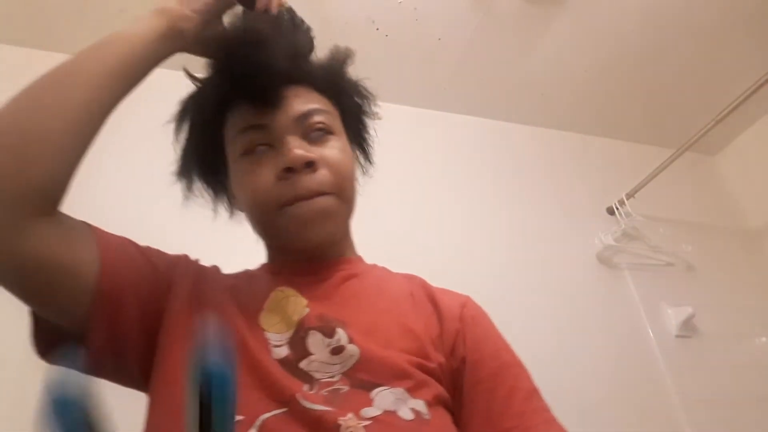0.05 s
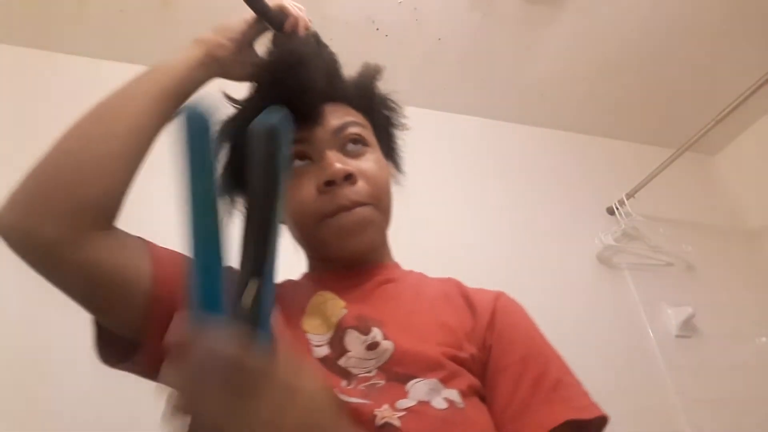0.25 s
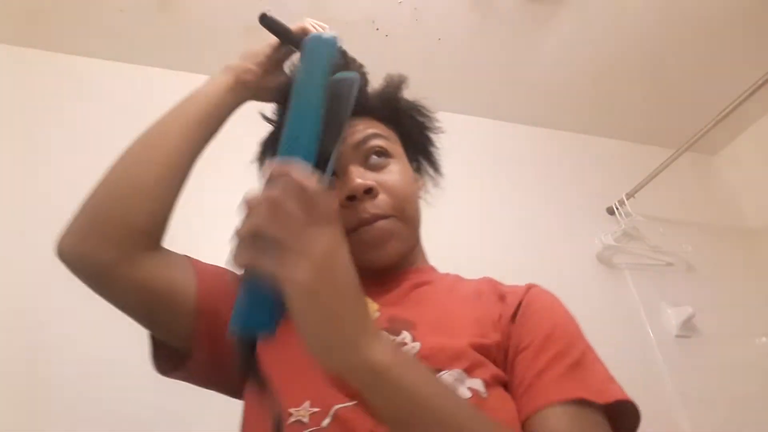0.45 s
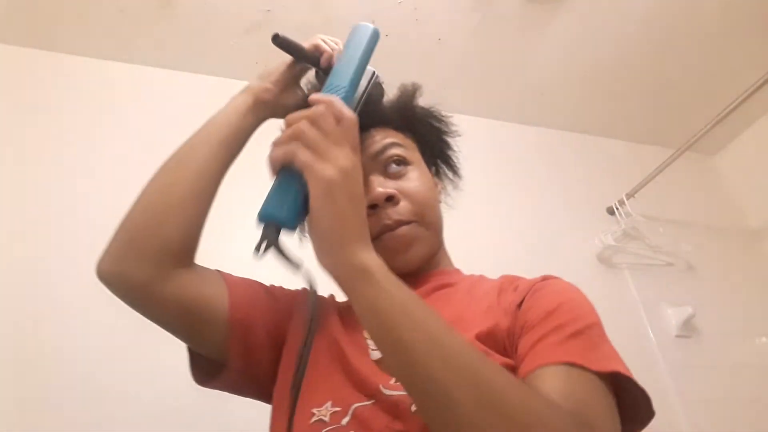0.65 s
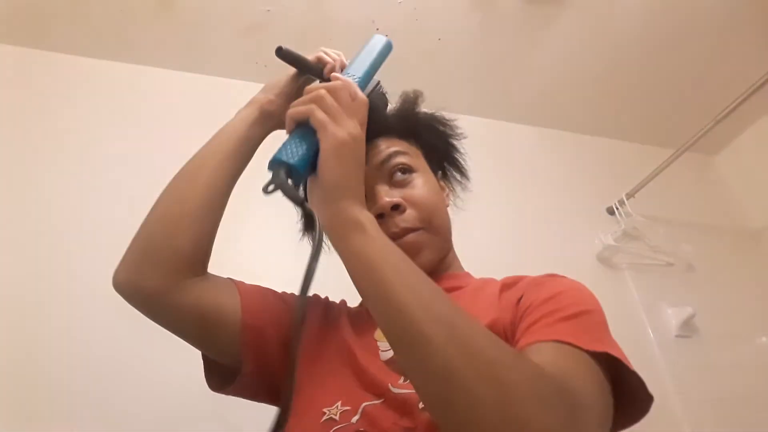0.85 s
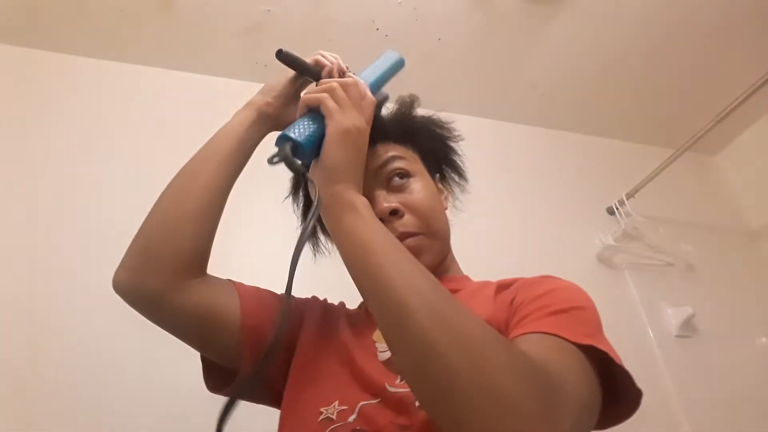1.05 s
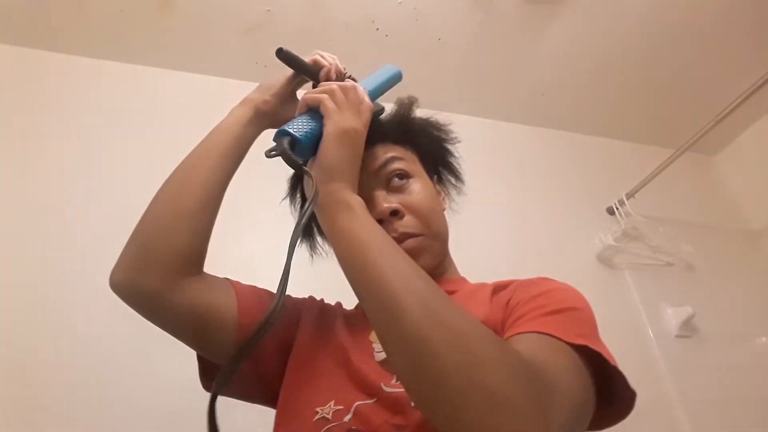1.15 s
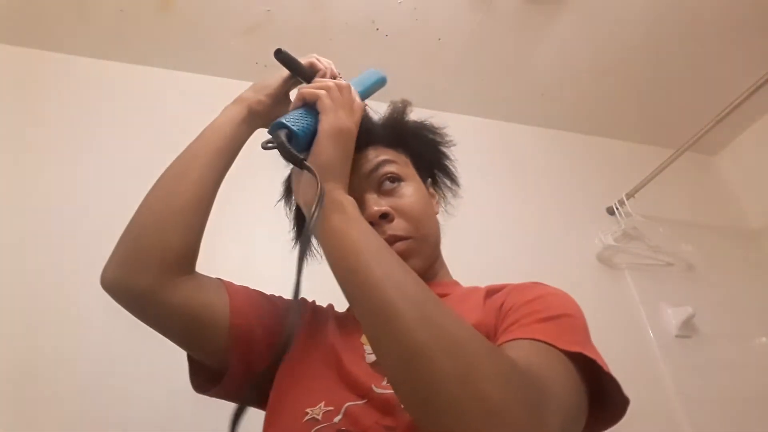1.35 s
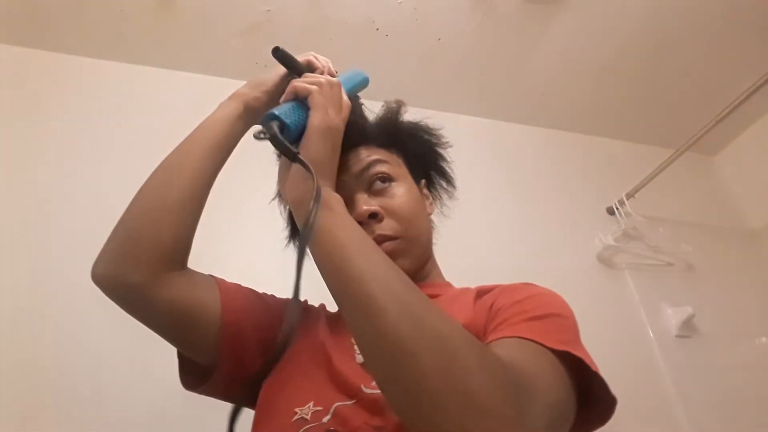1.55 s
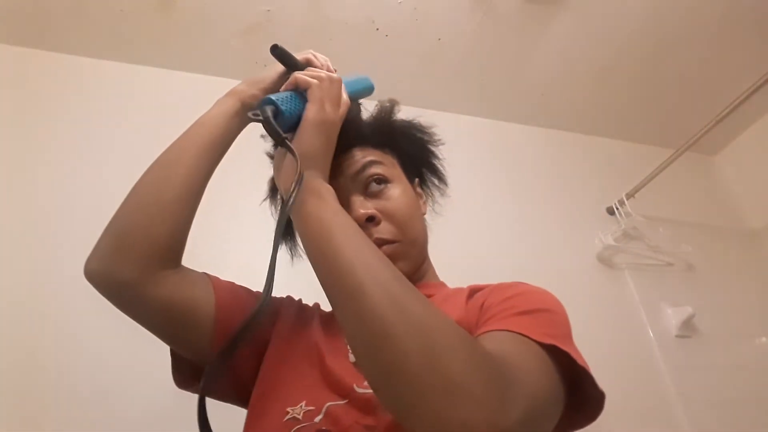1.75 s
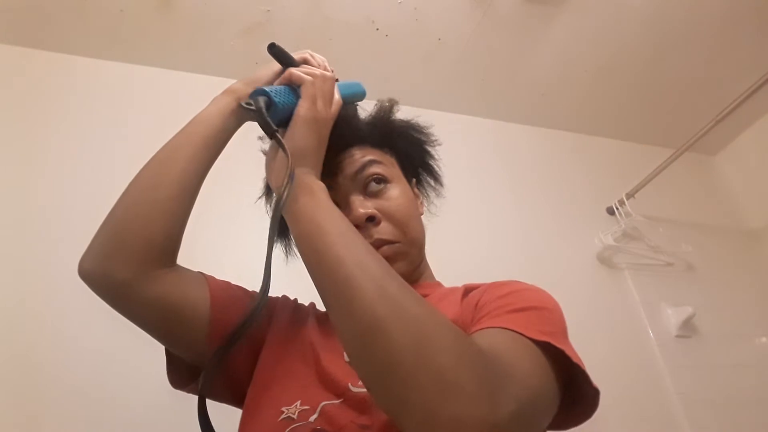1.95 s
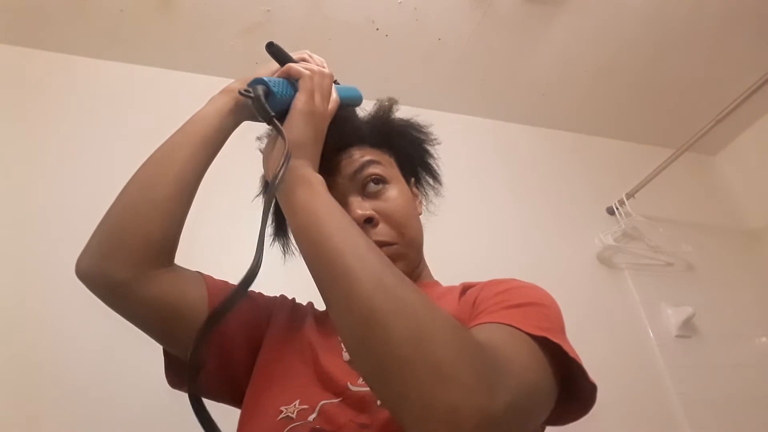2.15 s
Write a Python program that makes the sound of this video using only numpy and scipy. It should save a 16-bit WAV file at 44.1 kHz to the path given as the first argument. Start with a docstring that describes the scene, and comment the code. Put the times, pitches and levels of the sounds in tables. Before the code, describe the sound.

A hair flat iron is picked up with a quick cluster of plastic clacks and scrapes at about 0.2 seconds. Two sharp clacks with faint metal chinks follow at 0.55 and 0.75 seconds, amid light rubbing and a faint hair rustle. Softer knocks come near 1.1 and 1.3 seconds, each ringing briefly in the small bathroom. Then low ventilation rumble and thin hiss remain, with a slight rub around 2.1 seconds.

```python
"""A hair flat iron is picked up, handled and clamped on hair in a small, hard-walled bathroom.
Its plastic arms clack shut and the metal plates chink; the case, the cord and the hand scrape in between.
Each contact rings the case briefly and the room for longer. A stereo pair of microphones hears it
over a low ventilation rumble, a thin hiss and a faint rustle of hair."""
import sys
import numpy as np
from scipy import signal
from scipy.fft import rfft, irfft
from scipy.io import wavfile

SR = 44100
rng = np.random.default_rng(int(sys.argv[2]) if len(sys.argv) > 2 else 0)


def materialize(psi):
    """Save the field psi as 16-bit PCM at rate SR to the path in sys.argv[1].

    A 1-D psi becomes a single channel; in a 2-D psi each row is a channel.
    """
    bounded = np.clip(np.atleast_2d(psi).T, -1, 1)
    quanta = np.round(bounded * 32767).astype(np.int16)
    wavfile.write(sys.argv[1], SR, quanta)


N = 97020

# how alike the two microphones hear the diffuse field: frequency_hz, correlation
MIC_LIKENESS = [(60, 0.98), (170, 0.94), (350, 0.78), (700, 0.27), (1200, -0.21), (3000, 0), (16000, 0)]


def undb(db):
    """Decibels to gain."""
    return 10 ** (np.asarray(db) / 20)


def unit(x):
    """Scale to rms 1."""
    return x / np.sqrt(np.mean(x ** 2))


def pan(db):
    """Left and right gains for a level difference."""
    return undb(np.array([[db], [-db]]) / 2)


def along(table, hz):
    """Read a two-column table on a log-frequency axis."""
    table = np.array(table)
    return np.interp(np.log(hz + 1e-9), np.log(table[:, 0]), table[:, 1])


def bins():
    """Frequencies of the spectrum of a full-length signal."""
    return np.arange(N // 2 + 1) * SR / N


def shape(x, spectrum):
    """Minimum-phase filter that follows a table of frequency_hz, level_db."""
    cepstrum = irfft(np.log(undb(along(spectrum, bins())) + 1e-9), N)
    cepstrum[1:N // 2] *= 2
    cepstrum[N // 2 + 1:] = 0
    response = irfft(np.exp(rfft(cepstrum)), N)[:N // 20]
    return signal.fftconvolve(x, response)[:N]


def soften(x, treble_hz, bass_hz):
    """A softer contact loses treble but for a little grit; a lighter one loses bass."""
    dull = signal.sosfilt(signal.butter(2, treble_hz, fs=SR, output="sos"), x + 1e-18)
    grit = undb(-14.5) * x * treble_hz / 3000
    return signal.sosfilt(signal.butter(1, bass_hz, "high", fs=SR, output="sos"), dull + grit)


def resonate(x, hz, width_hz):
    """Band-pass with gain 1 at the centre."""
    return signal.lfilter(*signal.iirpeak(hz, hz / width_hz, fs=SR), x)


def ring(hz, db, t60, phase=0):
    """Impulse response of one mode, with gain db at its peak."""
    t, rate = np.arange(SR // 2) / SR, np.log(1000) / t60
    return undb(db) * 2 * rate / SR * np.exp(-rate * t) * np.cos(2 * np.pi * hz * t + phase)


def diffuse():
    """Spectra of white noise at the two microphones, alike in the bass."""
    likeness = np.clip(along(MIC_LIKENESS, bins()), -.99, .99)
    mid, side = rfft(rng.standard_normal((2, N)))
    return mid * np.sqrt((1 + likeness) / 2) + np.array([[1], [-1]]) * side * np.sqrt((1 - likeness) / 2)


def ventilation():
    """Room tone: steady rumble, stronger at the left microphone, and bands of hiss that swell and sink."""
    # rumble and its faint treble: frequency_hz, relative_density_db
    rumble_spectrum = [(25, -21), (42, -33), (59, -11.5), (80, -24.5), (100, -13), (125, -6.5), (170, -2),
                       (230, -6.5), (320, -12), (450, -23), (850, -24), (1500, -29), (2300, -33.5),
                       (4000, -35.5), (6500, -43.5), (10000, -43), (16000, -37.5)]
    # narrow bands of hiss: centre_hz, width_hz, level_db
    hiss_bands = [(2787, 320, -69), (5320, 83, -81), (4880, 210, -79), (7900, 240, -94)]
    # drift added to the level of those bands: time_s, gain_db
    hiss_drift = [(0, 1), (.9, 6), (1.248, -3.5), (1.36, -0.5), (1.8, -3.5), (2.2, -0.5)]
    t, f = np.arange(N) / SR, bins()
    lean_left = 1.5 + (pan(5) - 1) / (1 + (f / 900) ** 2)
    rumble = unit(irfft(diffuse() * undb(along(rumble_spectrum, f)) * lean_left, N))
    hiss = 0
    for hz, width_hz, db in hiss_bands:
        band = diffuse() / (1 + ((f - hz) / (width_hz / 2)) ** 2)
        hiss += undb(db) * unit(irfft(band, N))
    return rumble * undb(-52.5) + hiss * undb(np.interp(t, *np.array(hiss_drift).T))


def hair():
    """Hair rustles faintly between the fingers until the plates hold it."""
    level_db, fade_s = -69.5, (0.88, 1.16)
    rustle = unit(resonate(rng.standard_normal((2, N)), hz=7140, width_hz=11025))
    return rustle * undb(level_db) * np.interp(np.arange(N) / SR, fade_s, (1, 0))


def slips(per_s=1300, scatter_db=3):
    """Dense stick-slip clicks of uneven size, rms 1."""
    clicks = (rng.random(N) < per_s / SR) * rng.choice([-1, 1], N)
    return unit(clicks * undb(scatter_db * rng.standard_normal(N)))


def scrapes():
    """Case, cord and hand rub: stick-slip that swells, holds and dies away, each with one resonance."""
    # rubs: start_s, attack_s, hold_s, release_s, relative_db, treble_hz, bass_hz, resonance_hz
    strokes = [(0.202, 0.0054, 0.056, 0.0089, -24.5, 3520, 1580, 2920),
               (0.219, 0.014, 0.028, 0.0087, -25.5, 830, 110, 770),
               (0.288, 0.012, 0.07, 0.026, -35.5, 2500, 256, 635),
               (0.399, .018, 0.0063, 0.0075, -28.5, 2760, 394, 450),
               (0.474, .012, 0.0093, 0.037, -31.5, 3750, 1600, 2700),
               (0.663, .005, 0.028, 0.024, -31.5, 1500, 198, 350),
               (0.86, 0.017, 0.013, 0.023, -37.5, 2660, 640, 935),
               (.942, 0.017, 0.032, 0.022, -34, 1330, 129, 663),
               (1.036, 0.0058, 0.042, 0.013, -43, 1240, 250, 674),
               (1.131, 0.0031, 0.018, .012, -34.5, 4050, 2530, 2950),
               (1.145, 0.019, 0.032, 0.018, -37, 257, 130, 266),
               (2.1, 0.073, .05, .02, -46.5, 1370, 246, 503)]
    trim_db, resonance_db, resonance_q = -4.5, 2.5, 8.9
    t, out = np.arange(N) / SR, np.zeros(N)
    for start, attack, hold, release, db, treble_hz, bass_hz, hz in strokes:
        swell = np.clip((t - start) / attack, 0, 1)
        fade = np.exp(-np.maximum(t - start - attack - hold, 0) / release)
        rub = soften(slips() * swell * fade, treble_hz, bass_hz) * undb(db + trim_db)
        out += rub + undb(resonance_db) * resonate(rub, hz, hz / resonance_q)
    return out


def clacks():
    """One sharp push for each meeting of the arms, and a weaker rebound."""
    # knocks of arms and hinge: start_s, relative_db, treble_hz, bass_hz, rebound_ms, rebound_db
    knocks = [(.2060, -5, 4800, 1500, 3.8, -7), (0.216, -2, 4300, 1460, 1.47, -9.5),
              (.2360, -8.5, 3500, 150, 2.17, -6), (0.2439, -17, 4500, 500, 7.4, -22),
              (0.3884, -6, 3500, 407, 2.57, -8), (0.5497, 2.5, 4630, 420, 2.67, -13.5),
              (0.6661, -25, 1500, 350, 4, -14), (0.7552, 0.5, 4360, 400, 2.5, -15),
              (0.945, -18, 1200, 248, 4, -7), (1.1364, -10, 2620, 297, 4.16, -5),
              (1.3263, -12.5, 1210, 600, 3.2, -18)]
    trim_db, out = -4, np.zeros(N)
    for start, db, treble_hz, bass_hz, rebound_ms, rebound_db in knocks:
        push = np.zeros(N)
        push[int(start * SR)] = undb(db + trim_db)
        push[int((start + rebound_ms / 1000) * SR)] += undb(db + trim_db + rebound_db)
        out += soften(push, treble_hz, bass_hz)
    return out


def chinks():
    """The loose metal plates chatter briefly at a high resonance."""
    # touches of the plates: start_s, relative_db, pitch_hz, width_hz, decay_s
    touches = [(.5500, -24, 7560, 3000, 0.0098), (.561, -23, 7550, 700, .002),
               (.7560, -30.5, 8150, 3000, .012), (0.873, -45, 7840, 910, 0.026),
               (1.1357, -21, 4850, 600, 0.009), (1.1351, -24.5, 10000, 5000, 0.00047)]
    trim_db = -15.5
    t, out = np.arange(N) / SR, np.zeros(N)
    for start, db, hz, width_hz, decay in touches:
        chatter = rng.standard_normal(N) * (t >= start) * np.exp(-abs(t - start) / decay)
        out += resonate(chatter, hz, width_hz) * undb(db + trim_db)
    return out


def flat_iron():
    """The iron up close: clacks bend and ring the case, scrapes ring it less, the plates chink on top."""
    # modes of the case and plates: pitch_hz, level_over_contact_db, t60_s
    case_modes = [(411, 0, 0.022), (842, 3, 0.021), (1050, 8.5, 0.034), (1800, 3, 0.032),
                  (2257, 0.5, 0.018), (2675, 6, 0.015), (3670, -6, 0.025), (7900, 8, 0.011)]
    # tone of a knock on the case: frequency_hz, level_db
    knock_spectrum = [(60, 1.5), (170, -0.5), (400, 7), (620, 3.5), (950, 0), (1550, 0), (2500, -1.5),
                      (4000, -1.5), (6000, -7), (8000, -11), (11000, -8), (16000, -19)]
    # tone of rubbing: frequency_hz, level_db
    rub_spectrum = [(60, -8), (170, 10.5), (330, 0), (460, 0), (680, -0.5), (1000, -0.5), (1550, -2),
                    (2200, -1.5), (3200, -4), (4300, -3), (6000, -13), (8000, -6), (11000, -17.5),
                    (16000, -30)]
    case = sum(ring(hz, db, t60) for hz, db, t60 in case_modes)
    push, rub = clacks(), scrapes()
    bent = push - 2 * resonate(push, hz=1300, width_hz=1380)  # bending waves in this band arrive late
    struck = bent + signal.fftconvolve(bent, case)[:N]
    rubbed = rub + undb(-16.5) * signal.fftconvolve(rub, case)[:N]
    return shape(struck, knock_spectrum) + shape(rubbed, rub_spectrum) + chinks()


def arrival(ms):
    """An impulse that reaches a microphone ms late, placed between samples."""
    offset = np.arange(SR // 2) - ms / 1000 * SR
    return np.sinc(offset) * (abs(offset) < 8)


def bathroom(early_db):
    """From iron to microphones: direct path, first reflections, a diffuse tail and standing waves."""
    # first reflections off mirror, counter and walls: delay_ms, left_db, right_db
    reflections = [(.9, -3.5, -9.5), (1.95, -12, -33), (2.5, -6, -46), (4.6, -17.5, -6), (12.4, -5, -12.5),
                   (17.6, -8.5, -16)]
    # diffuse reverberation: frequency_hz, t60_s, level_db
    reverb_bands = [(99, 0.93, -1.5), (202, 0.57, 2.5), (540, 0.4, -0.5), (1340, .29, 2), (3630, 0.35, 0.5),
                    (8100, 0.29, 2), (15100, .14, -1)]
    # standing waves between the walls: pitch_hz, level_db, t60_s
    standing_waves = [(174.3, 4, 0.35), (393, 4, 0.28), (500, 10.5, 0.86), (543.5, 9.5, 0.18),
                      (638.6, 7.5, 0.39), (746, 5, 0.48), (791, 7.5, 0.24), (866, -1, 0.59), (1067, 0, 1),
                      (1118, -3, 0.31), (1286, 13, 0.54), (1335, 14.5, 0.17)]
    direct_lag_ms, reflection_lag_ms = 0.034, 0.14  # the right microphone hears each later
    t, build_s = np.arange(SR // 2) / SR, 0.00067
    early = np.array([arrival(0), arrival(direct_lag_ms)]) * pan(3)
    for ms, left_db, right_db in reflections:
        early += np.array([undb(left_db) * arrival(ms), undb(right_db) * arrival(ms + reflection_lag_ms)])
    noise, tail = diffuse(), 0
    log_centres = np.log(np.array(reverb_bands)[:, 0])
    for (_, t60, db), this_band in zip(reverb_bands, np.eye(len(reverb_bands))):
        share = np.interp(np.log(bins() + 1), log_centres, this_band)
        band = irfft(noise * share, N)[:, :len(t)]
        rate = np.log(1000) / t60
        tail += band * np.exp(-rate * t) * np.sqrt(2 * rate / SR) * undb(db)
    for hz, db, t60 in standing_waves:
        mic_phases = np.arccos(along(MIC_LIKENESS, hz)) * np.array([[.5], [-.5]])
        tail += ring(hz, db, t60, rng.uniform(0, 2 * np.pi) + mic_phases)
    return early * undb(early_db) + tail * (1 - np.exp(-t / build_s)) * pan(1)


def scene():
    """The iron moves before the microphones, sounding the walls differently at each place."""
    # places that the iron passes as it is lifted: time_s, direct_and_reflections_db
    places = [(.25, -4), (.55, -1.5), (.76, -3), (1.14, 0)]
    t, out = np.arange(N) / SR, ventilation() + hair()
    iron = flat_iron()
    for (_, early_db), this_place in zip(places, np.eye(len(places))):
        crossfade = np.sqrt(np.interp(t, np.array(places)[:, 0], this_place))
        out += signal.fftconvolve((iron * crossfade)[None], bathroom(early_db), axes=1)[:, :N]
    return out


def record(dry):
    """The phone cuts the top of both microphones steeply."""
    top_hz = 16000
    return signal.sosfilt(signal.ellip(10, .2, 70, top_hz, fs=SR, output="sos"), dry)


dry = scene()
out = record(dry)
materialize(out)
```